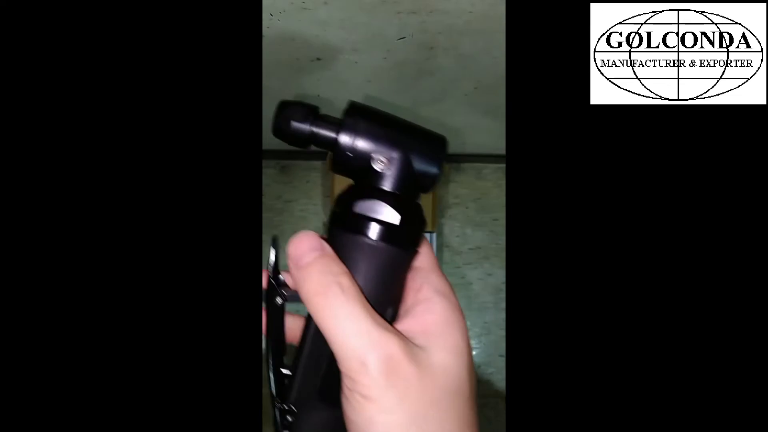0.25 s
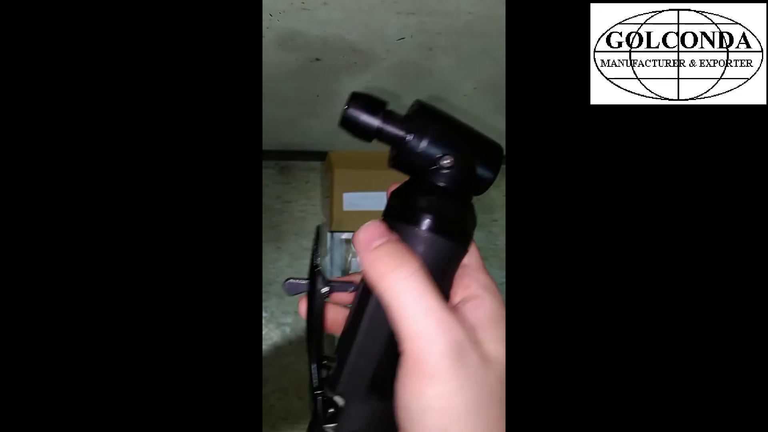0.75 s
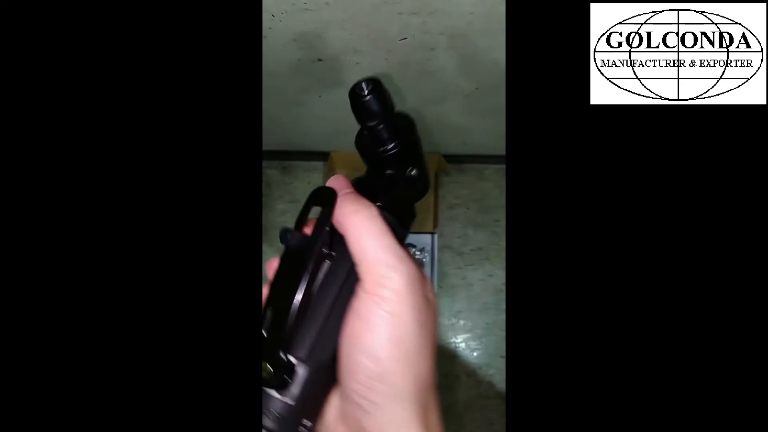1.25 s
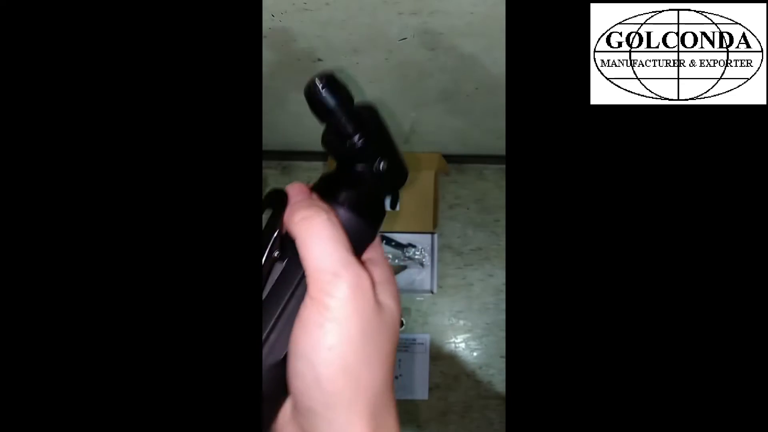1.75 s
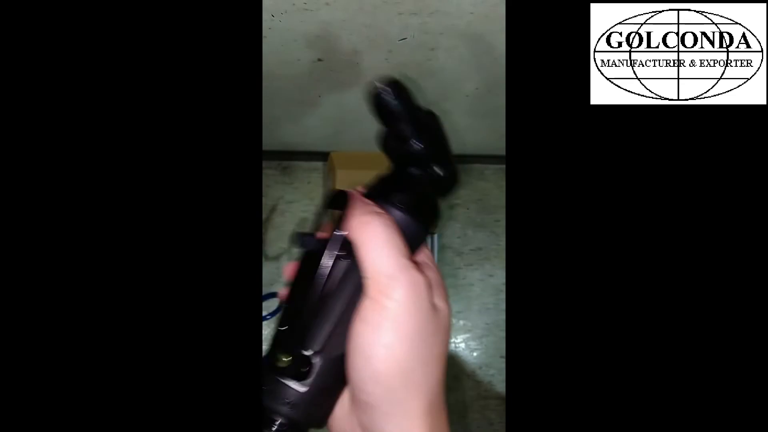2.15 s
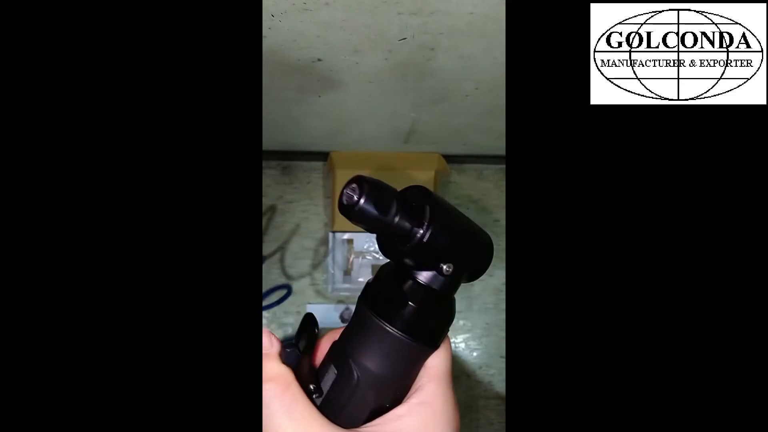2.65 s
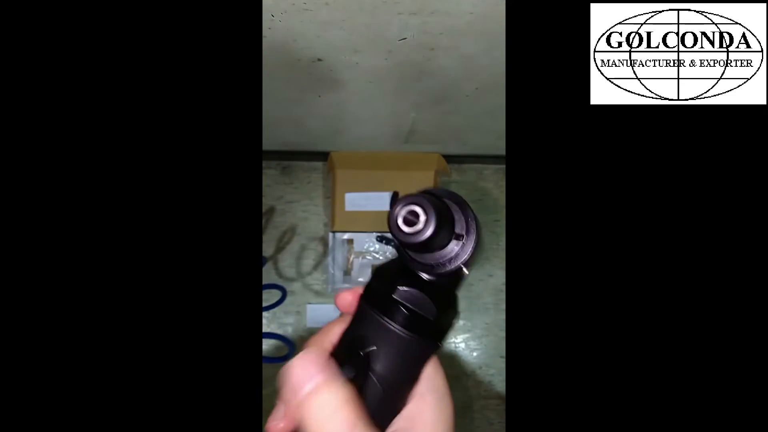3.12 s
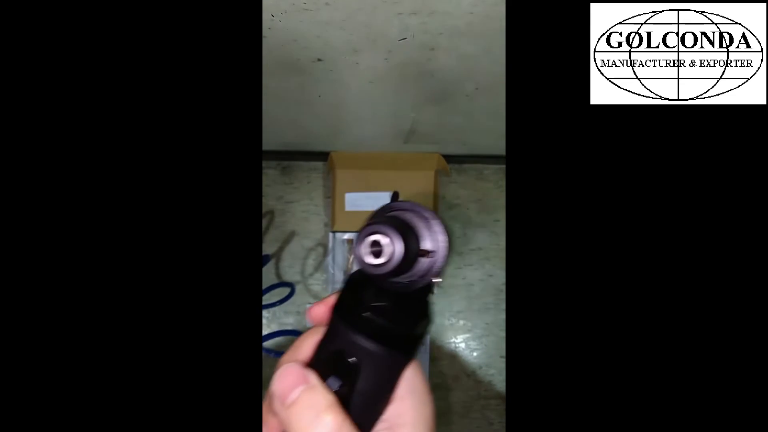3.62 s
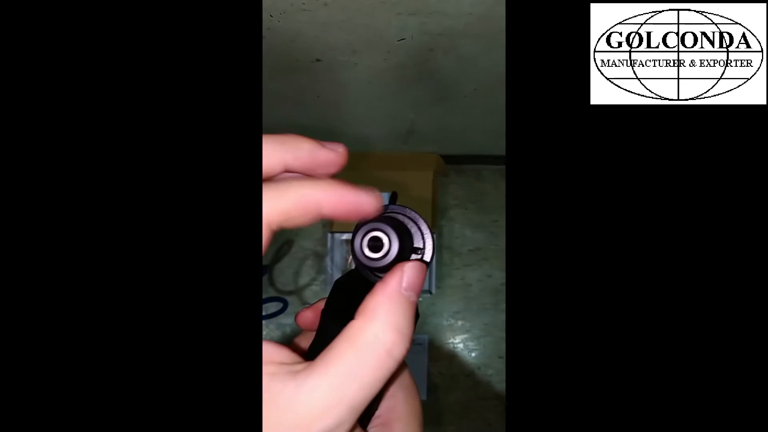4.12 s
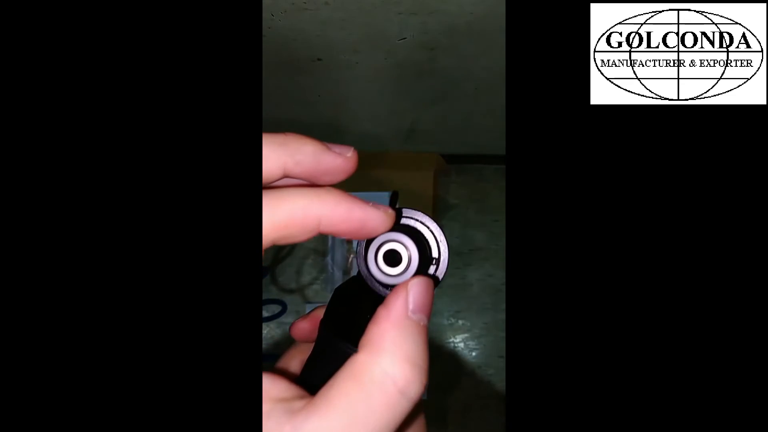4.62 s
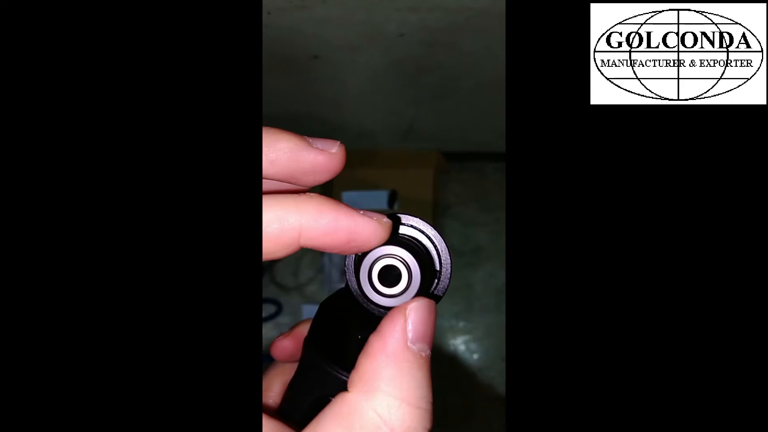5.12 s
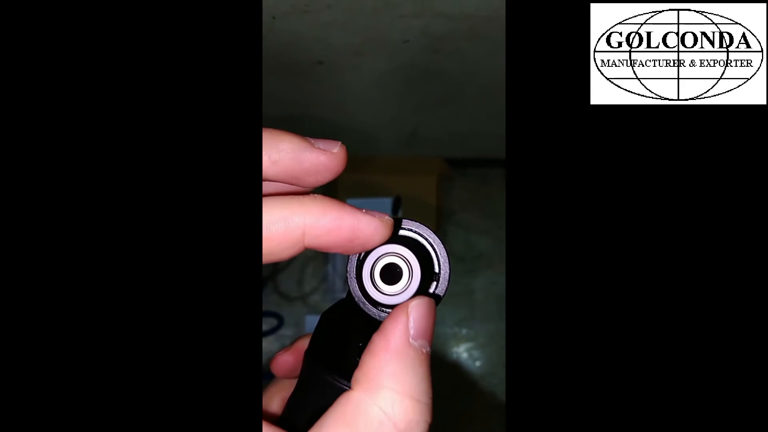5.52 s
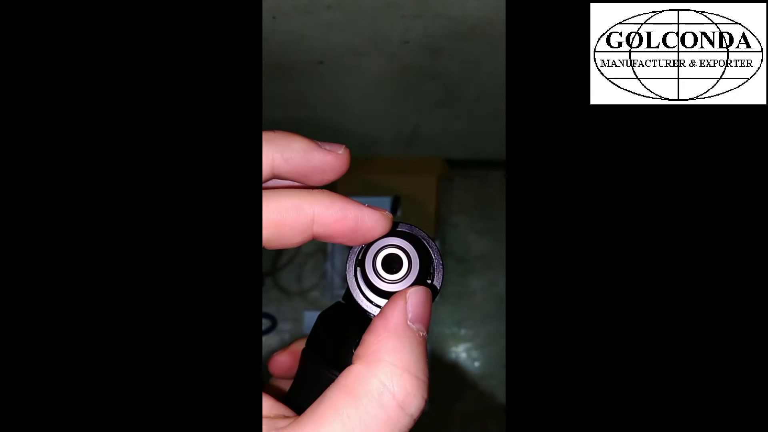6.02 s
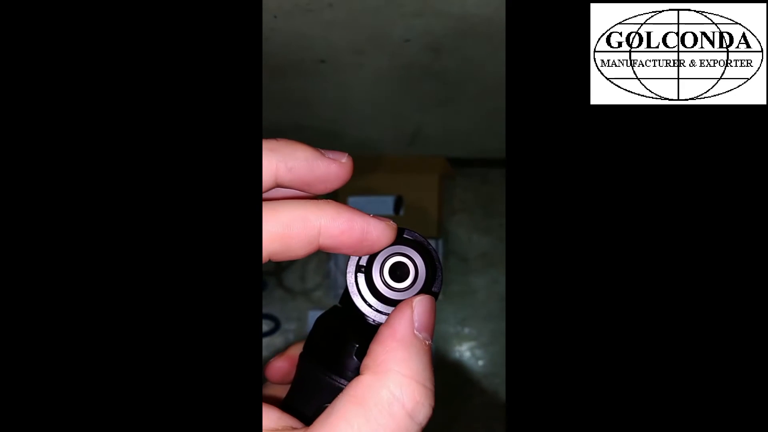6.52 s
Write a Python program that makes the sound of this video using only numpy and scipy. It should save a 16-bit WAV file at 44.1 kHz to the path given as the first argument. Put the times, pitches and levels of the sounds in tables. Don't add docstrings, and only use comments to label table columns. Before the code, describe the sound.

Small clicks and faint leaking air, a short slap of compressed air, then an air tool stutters up into a piercing whine inside roaring exhaust, left side only.

```python
import sys
import numpy as np
from scipy import signal
from scipy.fft import rfft, irfft, next_fast_len
from scipy.io import wavfile
from scipy.ndimage import uniform_filter1d, map_coordinates

SR = 44100
rng = np.random.default_rng(int(sys.argv[2]) if len(sys.argv) > 2 else 0)


def materialize(psi):
    bounded = np.clip(np.atleast_2d(psi).T, -1, 1)
    quanta = np.round(bounded * 32767).astype(np.int16)
    wavfile.write(sys.argv[1], SR, quanta)


def ratio(d):
    e = np.asarray(d, float) / 20
    return 10 ** e


N = 298116
TIME = np.arange(N) / SR
VANES = 4

# start_s, valve_opening (0-1)
THROTTLE = [
    (2.941, 1),
    (3.122, 0),
    (3.189, 1.012),
    (3.374, 0),
    (3.466, 1),
]


def vane_rate():
    # time_s, rate_hz
    free_speed = [(2.94, 1250), (3.12, 1245), (3.19, 1190), (3.37, 1118), (3.46, 1115), (3.61, 1100.6),
                  (3.8, 1033), (3.9, 1005.5), (4.02, 983), (4.2, 961), (4.41, 947.6), (4.71, 939.6),
                  (5.5, 940.2), (5.66, 943.8), (5.96, 954), (6.13, 955.3), (6.41, 951.6), (6.71, 957.7)]
    rate = np.zeros(N)
    free = np.interp(TIME, *np.transpose(free_speed))
    for s, opening in THROTTLE:
        i = round(s * SR)
        lag_s = .027 if opening else .055
        target = opening * free[i:]
        rate[i:] = target + (rate[i] - opening * free[i:]) * np.exp(-(TIME[i:] - s) / lag_s)
    return rate


def labouring(rate):
    s, opening = np.transpose(THROTTLE)
    current = np.clip(np.searchsorted(s, TIME) - 1, 0, None)
    shut = (opening[current] == 0) * 1.0
    slow = np.clip(1.3 - rate / 750, 0, 1)
    return np.maximum(uniform_filter1d(shut, size=400, origin=150), slow)


def motor(shaft, braking, rate):
    # time_s, level_db
    vane_level = [(2.94, -41.5), (3.0, -34.5), (3.11, -24), (3.25, -29), (3.365, -33), (3.51, -31),
                  (3.65, -25), (3.78, -27.5), (3.9, -32.5), (5.4, -35), (6.2, -40), (6.76, -34.5)]
    # early_db, middle_db, late_db
    octave_level = [-34.5, -43.5, -31]
    # multiple_of_vane_rate, early_db, middle_db, late_db
    vane_orders = [(3, -43, -36, -40), (4, -36, -33, -38), (5, -41, -32.5, -37), (6, -38.5, -40, -38),
                   (7, -46, -43, -40), (9, -30.5, -40, -34), (10, -34, -27, -32), (12, -28.5, -31, -36),
                   (13, -35, -28, -30), (14, -39, -34, -36), (15, -47, -33, -38), (16, -46, -42, -40)]
    # multiple_of_shaft_rate, early_db, middle_db, late_db
    shaft_orders = [(1, -54, -52, -50), (2, -51, -50, -50), (3, -52, -58, -53), (10, -54, -53, -53),
                    (13, -55, -47, -58), (15, -48, -45, -47), (17, -41, -44, -43), (18, -38.5, -41, -41),
                    (19, -39.5, -40, -43), (23, -45, -45, -44), (35, -43, -43, -33), (43, -36, -29, -32),
                    (46, -39, -50, -36), (47, -34, -30, -29), (50, -36, -38, -43), (51, -43, -43, -34),
                    (53, -44, -33, -40), (54, -43, -35, -42), (59, -50, -40, -42), (65, -55, -42, -42)]
    casing_hz, muffler_hz = 1036, 2230

    def octaves_off(hz, centre_hz):
        return np.abs(np.log2((np.abs(hz) + 1) / centre_hz))

    free = 1 - braking
    tone = free * ratio(curves(vane_level)[0]) + braking * ratio(-16.5 - 5 * octaves_off(rate, casing_hz))
    thump = braking * ratio(-23 - 6.5 * octaves_off(2 * rate, casing_hz))
    thump *= ratio(3 * wobble(140))
    muffler_db = 25 * octaves_off(2 * rate, muffler_hz)
    octave = thump + free * ratio(turned(*octave_level) - muffler_db)
    rattle = braking * wobble(160)

    sound = tone * ratio(0.71 * wobble(16)) * np.sin(VANES * shaft + .4 * rattle)
    sound += octave * ratio(1.1 * wobble(18)) * np.sin(2 * VANES * shaft + 0.6 + 1.3 * rattle)
    for k, db in enumerate([-8, -13, -17, -21]):
        phase = (k + 3) * VANES * shaft + 2.2 * wobble(220)
        sound += thump * ratio(db + 4 * wobble(120)) * np.sin(phase)
    third = np.interp(TIME, [2.98, 3.25, 3.5, 3.6], [.3, 1.1, 1, 0]) * free
    sound += third * ratio(-35.5 + 2.5 * wobble(20)) * np.sin(3 * VANES * shaft)
    sound *= 1 + (.07 + .13 * braking) * np.cos(shaft + 1.3)

    seated = np.interp(TIME, [2.95, 3.05, 3.48, 3.56], [0, 0.38, 0.65, 0.97]) * free
    unsteady = shaft + .012 * wobble(45)
    for order, *poses in shaft_orders + [(VANES * k, *poses) for k, *poses in vane_orders]:
        db = turned(*poses) + .5 * wobble(5) + 2 * wobble(45)
        phase = order * unsteady + .3 * wobble(30) + rng.uniform(0, 2 * np.pi)
        sound += seated * ratio(db + .7 + .035 * order) * np.sin(phase)
    return np.sqrt(2) * sound


def turned(early, middle, late):
    turns = [
        3.9,
        4.45,
        5.56,
        5.68,
    ]
    return np.interp(TIME, turns, [early, middle, middle, late])


def exhaust(shaft):
    # open_s, shut_s
    blast = (1.963, 2.071)
    # hiss_db, wind_on_port_db, roar_left_after_shutting_db, fade_db_per_s
    openings = [
        (-16.5, -29.5, -11.5, 219.5),
        (-15, -35, 10, 114.5),
        (-14, -36.5, 4, 141),
        (-14.5, -41.5, -3, 200),
    ]
    # time_s, level_db
    swing = [(3.6, 0.5), (3.8, -1), (4.07, -1), (4.15, -3.5), (4.79, -2.5), (4.97, -4), (5.01, -3),
             (5.24, -2), (5.54, -2), (6.03, -1.5), (6.19, -2.5), (6.47, -1), (6.76, -1)]
    # frequency_hz, density_db (per Hz)
    hiss_spectrum = [(2940, -30), (5000, -15), (7280, -8), (8010, -2), (11100, 3), (12400, 1.5),
                     (13200, -2.5), (15100, -3.5), (15800, -10)]
    # frequency_hz, density_db (per Hz)
    roar_spectrum = [(400, -39), (800, -20), (1300, -9.5), (2500, -6.5), (4500, -4), (6000, -5.5),
                     (8000, -0.5), (10500, -28.5), (17000, -120)]
    # frequency_hz, density_db (per Hz)
    wind_spectrum = [(10, -18.5), (25, -4), (60, -9.5), (130, -7), (400, -5), (900, -6.5), (1500, -11.5),
                     (2600, -120)]
    # early_db, middle_db, late_db
    wind_level = [-1, -2.5, -4]

    times = [s for s, opening in THROTTLE] + [N / SR]
    spans = [blast] + list(zip(times[::2], times[1::2]))
    swing_db = np.interp(TIME, *np.transpose(swing))
    layers = []
    for span, (hiss_db, wind_db, left_db, fade) in zip(spans, openings):
        layers.append([ratio(hiss_db) * flow(span, left_db=-2.5, fade=fade, puff_db=2),
                       flow(span, left_db, fade, puff_db=2),
                       ratio(wind_db) * flow(span, left_db=-27, fade=fade, puff_db=4)])
    hiss, roar, wind = np.max(layers, axis=0)
    roar_db = turned(-23.5, -23.5, -22.5) + 0.66 * swing_db - 3.0
    wind_db = turned(*wind_level) + 0.33 * swing_db + 1.63 * wobble(30)
    hiss = hiss * ratio(swing_db - 3.0) * rush(hiss_spectrum, patchy_db=0.97)
    roar = roar * ratio(roar_db) * rush(roar_spectrum, patchy_db=1.72)
    wind = wind * ratio(wind_db) * rush(wind_spectrum, patchy_db=3.5)
    chop = 1 + 0.19 * np.cos(VANES * shaft) + 0.028 * np.cos(shaft)
    return chop * (hiss + roar) + wind


def flow(span, left_db, fade, puff_db):
    open_s, close_s, puff_s = 0.0042, .007, 0.041
    since = np.clip(TIME - span[0], 0, None)
    after = np.clip(TIME - span[1], 0, None)
    left = min(ratio(left_db), 1)
    closing = (1 - left) * np.exp(-after / close_s) + left * ratio(-fade * after)
    puff = ratio(puff_db * np.exp(-since / puff_s))
    return np.clip(since / open_s, 0, 1) ** 2 * puff * closing


def push():
    # start_s, full_s, end_s, first_level, last_level (of full scale)
    presses = [
        (1.968, 1.972, 2.063, -.15, -.13),
        (3.051, 3.056, 3.064, -.05, -.03),
    ]
    # frequency_hz, density_db (per Hz)
    buffet_spectrum = [(10, -9.5), (30, -1), (150, -5), (500, -15), (1500, -38), (3000, -120)]
    lean = np.zeros(N)
    for start, full, end, first, last in presses:
        lean += np.interp(TIME, [start, full, end, end + 0.0072], [0, first, last, 0])
    lean = lean * (1 + 0.36 * rush(buffet_spectrum, patchy_db=3.0))
    leaked = filtered(lean, lambda hz: 1j * hz / (1j * hz + 1.6))
    return leaked + .0055 * (TIME > THROTTLE[0][0])


def metal():
    # centre_hz, width_hz, level_db
    lever_modes = [(2050, 110, -6), (3770, 560, -1.5), (4470, 330, -10), (7000, 420, -7), (9300, 220, -8.5),
                   (10400, 630, 0.5), (12100, 600, -22), (14800, 280, -25.5)]
    # centre_hz, width_hz, level_db
    catch_modes = [(1250, 280, -16.5), (3360, 310, -3.5), (4470, 150, -6.5), (5320, 350, -1),
                   (9600, 230, -14.5), (9700, 310, -2), (12000, 270, -17), (12900, 220, -4)]
    # centre_hz, width_hz, level_db
    housing_modes = [(474, 230, -2), (850, 96, 2), (1600, 350, -9)]
    # time_s, peak_db, body_share_db, t60_s
    lever_hits = [(0.5272, -49, -15, 0.012), (0.5506, -40, -17, 0.018), (1.4377, -23, 3.5, 0.016),
                  (1.4524, -35, -9, 0.012), (1.5507, -10.5, -10, 0.011), (1.5564, -18.5, -8.5, 0.012),
                  (1.6037, -20, -5.5, 0.012), (1.6087, -16.5, -16, 0.01), (1.6296, -29.5, -5, 0.012),
                  (1.6419, 0, -13.5, 0.01), (1.6455, -8.5, -7.5, 0.014), (1.9076, -41, -24, 0.0098)]
    # time_s, peak_db, body_share_db, t60_s
    catch_hits = [(0.8828, -20, -13.5, 0.022), (0.9158, -25, -14, 0.012), (0.9424, -34, -9, 0.012),
                  (0.949, -33, -4, 0.012), (0.9988, -17, -7.5, 0.016), (1.008, -39, 3, 0.015),
                  (2.1247, 1, -25.5, 0.01), (2.1347, -19, -24, 0.012), (2.2804, -12, -9, 0.017),
                  (2.3083, -25.5, -9, 0.013), (2.5505, -44, -7, 0.012), (2.5694, -41, -10, 0.012)]
    # time_s, peak_db, t60_s
    knock = [(.977, -40.5, 0.08)]
    # time_s, level_db
    slide = [(1.556, -70), (1.565, -58), (1.59, -41.5), (1.6, -37), (1.612, -47), (1.64, -44), (1.645, -99)]
    sound = clicks(lever_hits, lever_modes) + clicks(catch_hits, catch_modes)
    sound += ratio(10) * filtered(chatter(knock), resonances(housing_modes))
    scrape = unit(filtered(rng.standard_normal(N), resonances(lever_modes)))
    return sound + ratio(curves(slide)[0] + 2.4 * wobble(200)) * scrape


def clicks(hits, modes):
    body = chatter([(s, db + body_db, t60) for s, db, body_db, t60 in hits])
    bright = chatter([(s, db, t60) for s, db, body_db, t60 in hits])
    low = [m for m in modes if m[0] < 6500]
    high = [m for m in modes if m[0] >= 6500]
    ring = ratio(13.5) * filtered(body, resonances(low)) + ratio(4) * filtered(bright, resonances(high))
    broad_high = resonances([(10500, 8000, 1.5)])
    crack = ratio(-2.5) * filtered(body, resonances([(3960, 6300, 0)]))
    crack += ratio(-10.5) * filtered(bright, lambda hz: broad_high(hz) ** 2)
    return ring + crack + ratio(-19.5) * walls(ring) + ratio(-11.0) * walls(crack)


def chatter(hits):
    out, t = np.zeros(N), np.arange(SR // 10) / SR
    for s, db, t60 in hits:
        decay_s = np.clip(.5 * t60, .003, .08)
        burst = ratio(db + 1.5 - 60 * t / decay_s) * rng.standard_normal(len(t))
        out[round((s + .001) * SR):][:len(t)] += burst
    return out


def resonances(modes):
    def response(f):
        total = 0
        for k, (c, w, db) in enumerate(modes):
            total = total + (-1) ** k * ratio(db) * 1j * f * w / (c * c - f * f + 1j * f * w)
        return total
    return response


def hands():
    # time_s, level_db
    seep = [(0, -66), (.3, -67), (.44, -65.5), (1.0, -61.5), (1.48, -68.5), (1.76, -77), (1.96, -55),
            (2.25, -60), (2.94, -65.5)]
    # frequency_hz, density_db (per Hz)
    leak_spectrum = [(2940, -49), (5000, -32), (5400, -20), (6940, -22.5), (8290, -22.5), (9080, -12.5),
                     (11000, -8.5), (13100, -16.5), (15800, -12.5)]
    # time_s, peak_db, fall_db_per_s (each side)
    rubs = [(.85, -69, 7), (1.61, -54.5, 170), (1.8, -87, 30), (2.32, -68.5, 28.5)]
    # frequency_hz, density_db (per Hz)
    rub_spectrum = [(590, -39), (1000, -9), (1220, -3), (1390, -3.5), (2970, -10), (3890, -12.5),
                    (6060, -13.5), (8000, -11), (10400, -34), (17600, -120)]
    # start_s, length_s, first_hz, last_hz, arch_hz
    whistles = [(.24, .16, 10500, 10600, 600), (.31, .08, 13950, 14300, -520),
                (.395, .085, 14700, 15200, -350), (.63, .095, 13400, 13900, -550),
                (.705, .07, 10000, 10400, 600), (2.41, .11, 11300, 11950, -200),
                (2.51, .19, 11950, 9700, 100), (2.46, .12, 10500, 10500, 300),
                (2.68, .08, 15700, 12100, 200)]
    leak_db, = curves(seep)
    rubbing = sum(ratio(db - fall * np.abs(TIME - s)) for s, db, fall in rubs)
    sound = ratio(leak_db + 0.8 * wobble(40)) * rush(leak_spectrum, patchy_db=4.0)
    sound += rubbing * ratio(1.7 * wobble(60)) * rush(rub_spectrum, patchy_db=3.0)
    for s, length, first, last, arch in whistles:
        fade = np.interp(TIME - s, [-.01, .01, length - .02, length], [0, 1, 1, 0])
        u = np.clip((TIME - s) / length, 0, 1)
        pitch = first + (last - first) * u + 4 * arch * u * (1 - u) + 25 * wobble(120)
        level = ratio(leak_db - 4.5 + 1.5 * wobble(30))
        sound += fade * level * np.sin(2 * np.pi * np.cumsum(pitch) / SR)
    return sound


def walls(x):
    # frequency_hz, t60_s
    wall_decay = [(1000, .25), (4000, .3), (11000, .36), (13500, .22), (15500, .13)]
    hz, t, z = signal.stft(rng.standard_normal(SR // 2), SR, nperseg=256)
    decay = ratio(-60 * t / along(wall_decay, hz)[:, None])
    tail = signal.istft(z * decay, SR, nperseg=256)[1]
    delayed = np.pad(x, (SR // 300, 0))
    return signal.fftconvolve(delayed, tail / np.linalg.norm(tail))[:N]


def room_tone():
    # frequency_hz, density_db (per Hz)
    room_spectrum = [(4.7, -27.5), (8.0, 3), (114, -12.5), (183, -12), (420, -23), (482, -25), (524, -24.5),
                     (840, -28), (912, -28), (1050, -31.5), (6000, -49.5), (7800, -81.5), (13200, -120)]
    return ratio(-52.5) * rush(room_spectrum, patchy_db=1.5)


def rush(spectrum, patchy_db):
    z = signal.stft(rng.standard_normal(N), nperseg=512)[2]
    field = uniform_filter1d(rng.standard_normal(z.shape), size=6, axis=0)
    field = uniform_filter1d(field, size=10, axis=1)
    x = signal.istft(z * ratio(patchy_db * unit(field)), nperseg=512)[1][:N]
    return unit(filtered(x, lambda hz: ratio(along(spectrum, hz))))


def wobble(rate):
    coarse = TIME[::N // 10000]
    knots = rng.standard_normal(int(N * rate / SR) + 4)
    return np.interp(TIME, coarse, map_coordinates(knots, [coarse * rate]))


def filtered(x, response):
    m = next_fast_len(N + SR // 2)
    return irfft(rfft(x, m) * response(np.fft.rfftfreq(m, 1 / SR)), m)[:N]


def curves(*spans):
    s, *cols = np.transpose(np.vstack(spans))
    return [np.interp(TIME, s, c, left=-120) for c in cols]


def along(points, hz):
    f, v = np.transpose(points)
    return np.interp(np.log(hz + 1), np.log(f + 1), v)


def unit(x):
    return x / np.sqrt(np.mean(x ** 2) + 1e-20)


def scene():
    rate = vane_rate()
    shaft = 2 * np.pi * np.cumsum(rate) / SR / VANES
    sound = motor(shaft, labouring(rate), rate) + exhaust(shaft) + push()
    sound += metal() + hands() + room_tone()
    return np.array([sound, np.zeros(N)])


def low_pass(x):
    return signal.sosfilt(signal.butter(12, 16250, fs=SR, output="sos"), x)


def record(dry):
    x = 2 * dry[0]
    clipped = x / (1 + np.abs(x / .97) ** 5.5) ** (1 / 5.5)
    left = filtered(clipped, lambda hz: np.clip((15900 - hz) / 250, 0, 1))
    return low_pass(np.array([left, dry[1]]))


dry = scene()
out = record(dry)
materialize(out)
```